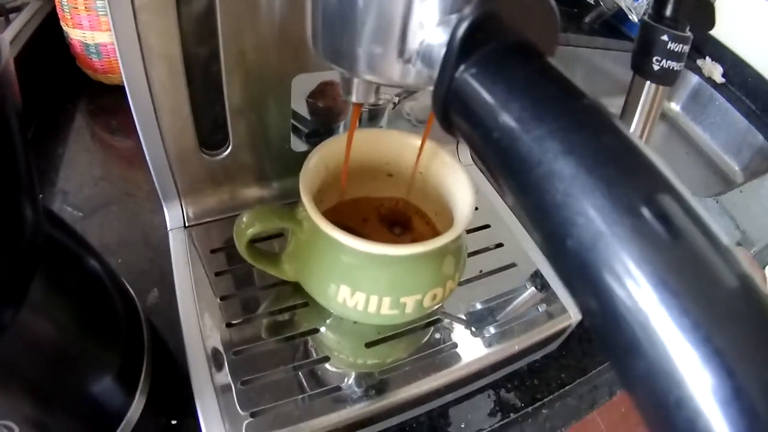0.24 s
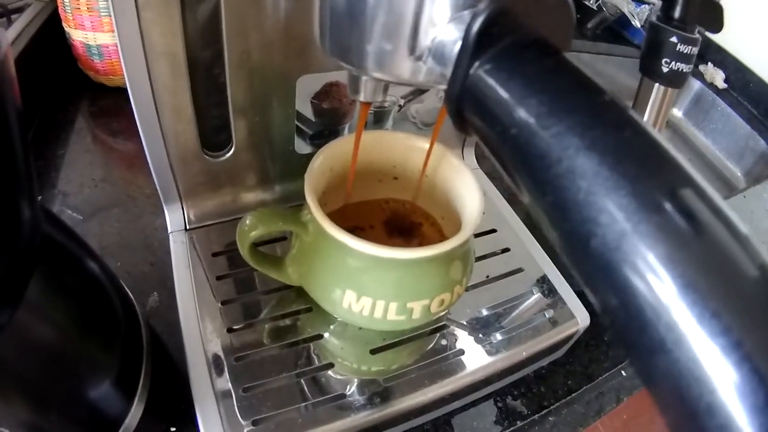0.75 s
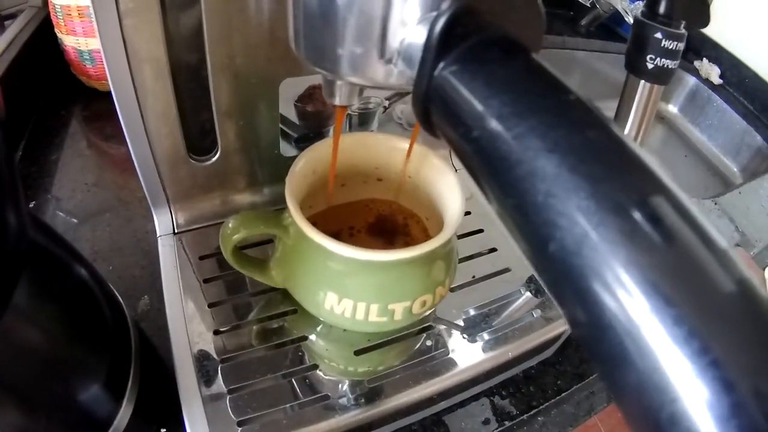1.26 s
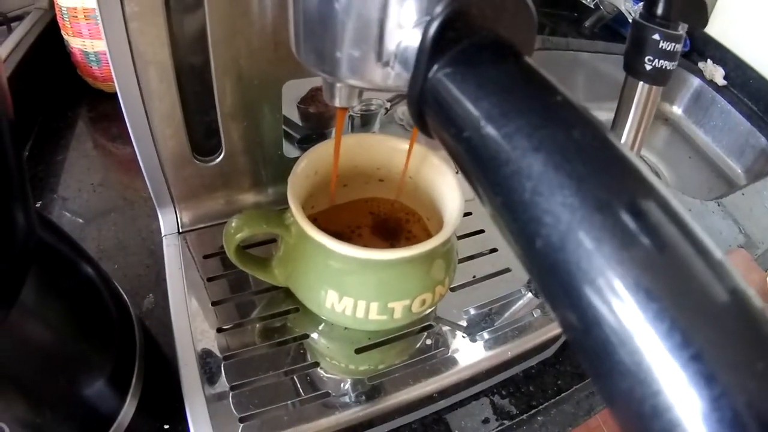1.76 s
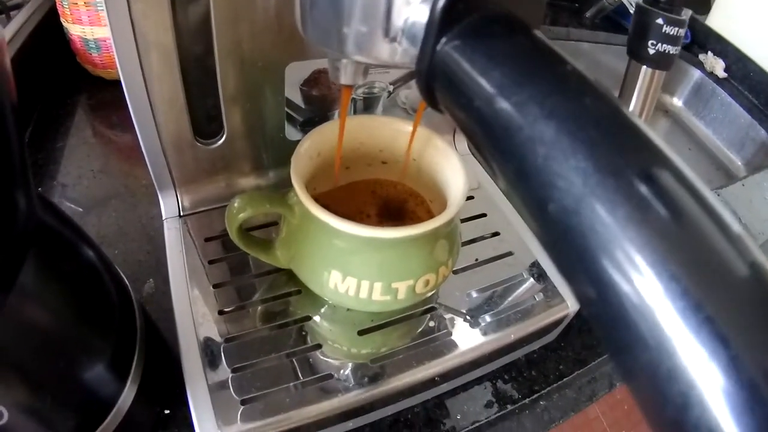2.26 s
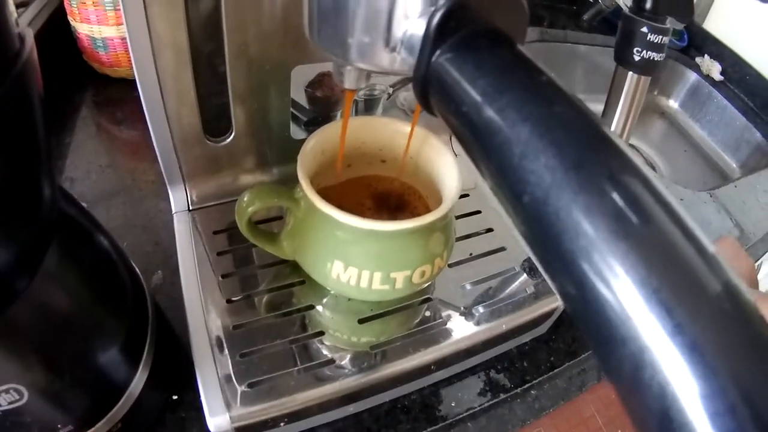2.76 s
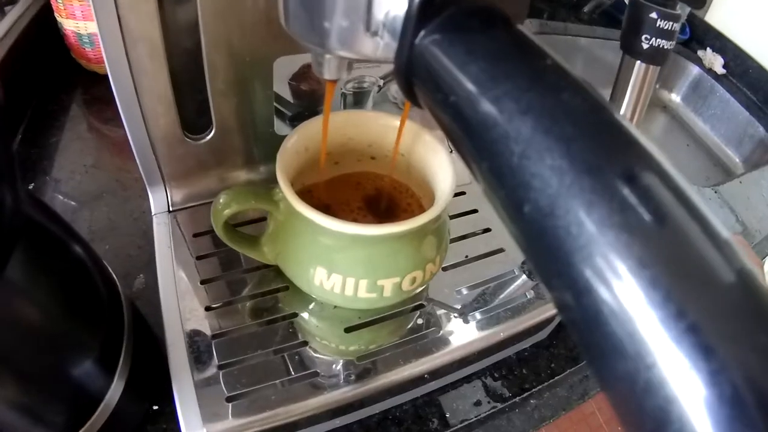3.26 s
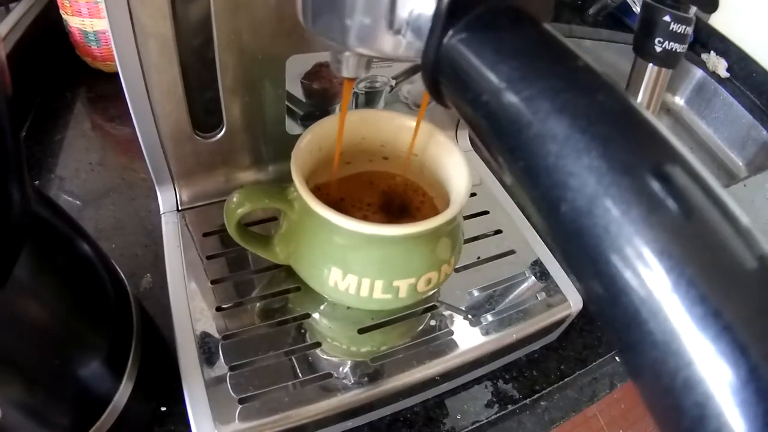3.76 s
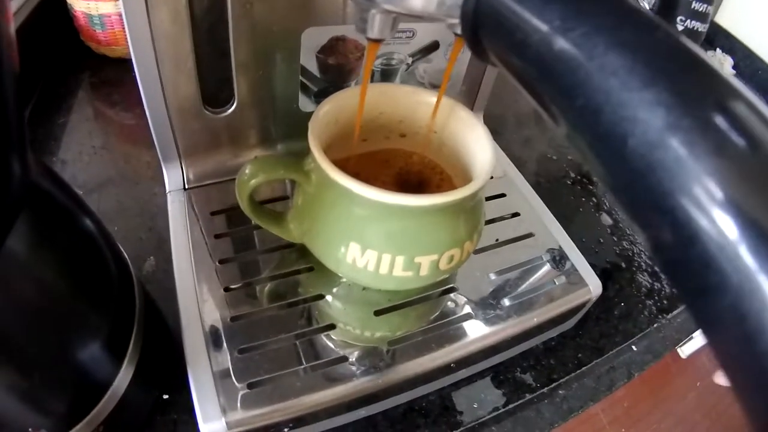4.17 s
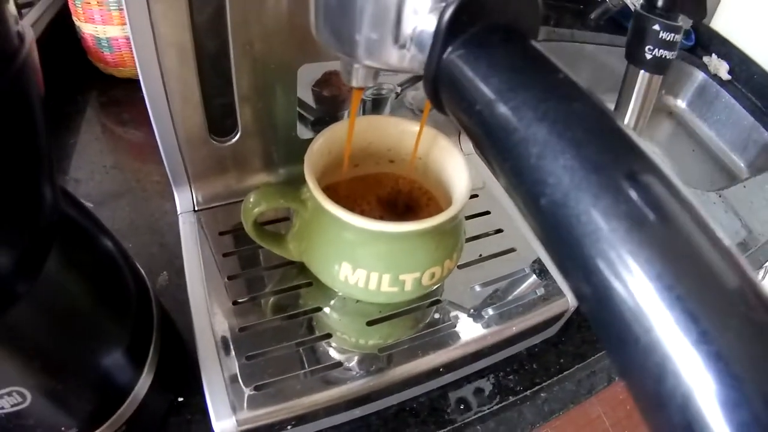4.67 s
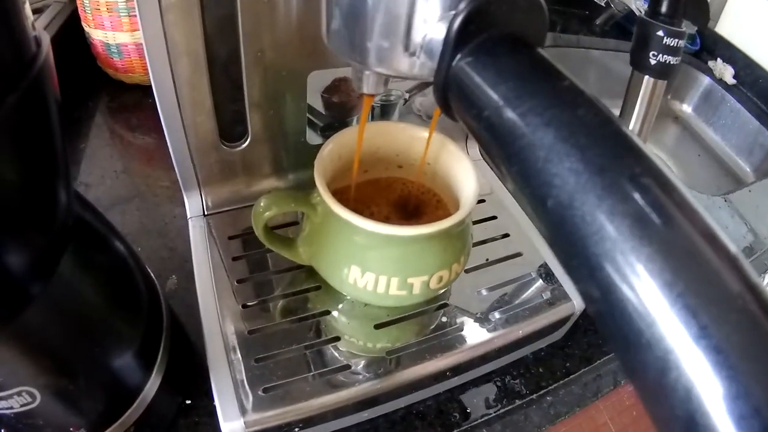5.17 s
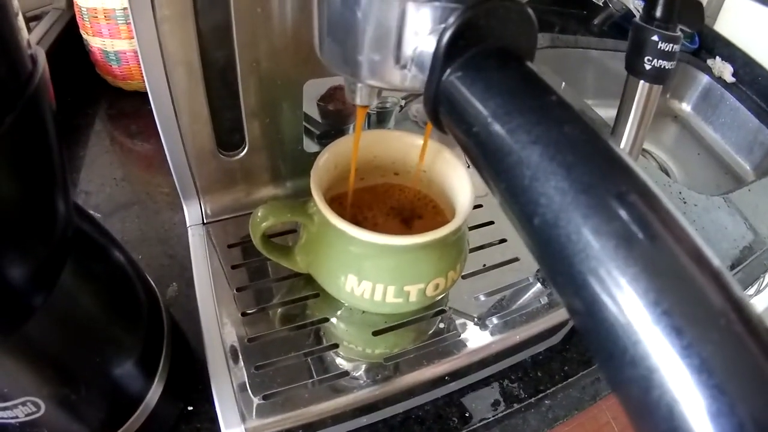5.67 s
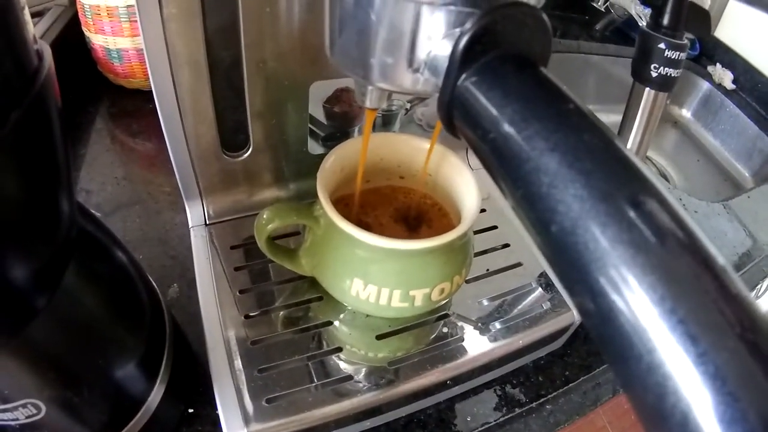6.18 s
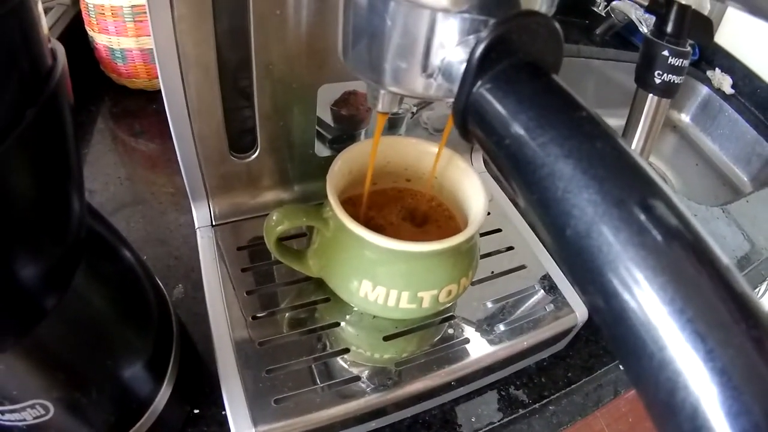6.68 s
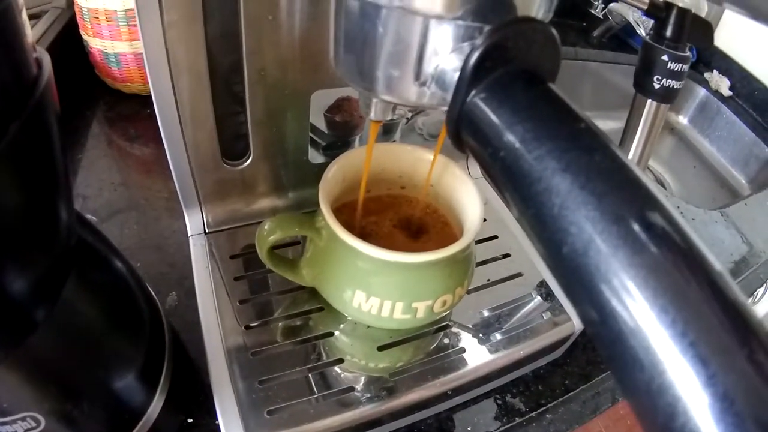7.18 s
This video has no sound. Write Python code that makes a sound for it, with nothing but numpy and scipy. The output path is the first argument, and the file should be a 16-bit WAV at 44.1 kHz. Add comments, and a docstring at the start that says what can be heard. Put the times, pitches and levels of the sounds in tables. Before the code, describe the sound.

Close mains-rate coffee pump drone with irregular cup-on-tray clatter, busy and sharp at first, later sparser and duller, over fine liquid fizz.

```python
"""A vibratory pump, stroking once per mains cycle, makes a coffee machine's housing hum close to a phone.
The hum is a sum of stroke-rate partials: an opening colour fades into a middle one, then shifts to a late one.
The filling cup rattles on the shaking drip tray: short pushes and small clicks ring their shared modes.
Filtered noise makes the valve hiss once a stroke, the splashes, the flickering treble and the room murmur;
random clicks make the trickle fizz in the cup."""
import sys
import numpy as np
from scipy import signal
from scipy.fft import rfft, irfft
from scipy.io import wavfile
from scipy.ndimage import uniform_filter1d

SR = 44100
rng = np.random.default_rng(int(sys.argv[2]) if len(sys.argv) > 2 else 0)


def digitize_waveform(pressure):
    """Quantize a signal to 16-bit integers and store it at the path in sys.argv[1].

    Rows of a 2-D input are taken as channels; values are limited to [-1, 1].
    """
    field = np.atleast_2d(pressure).T
    bounded = np.clip(field, -1, 1)
    quanta = np.round(bounded * 32767).astype(np.int16)
    wavfile.write(sys.argv[1], SR, quanta)


N = 327701

# modes of cup on tray: (frequency [Hz], relative level [dB], t60 [s])
TRAY_MODES = [(630, 15, 0.07), (781, 12, 0.051), (829.3, 15, 0.12), (907, 8, 0.13), (1026, 12.5, 0.028),
              (1117, 3.5, 0.037), (1258, 8.5, 0.089), (1351, 16.5, 0.022), (1440, 16.5, 0.038),
              (1408, -5, 0.036), (1660, -3, 0.075), (2354, 11.5, 0.026), (2900, -26, 0.012),
              (3754, 20, 0.018), (3900, -23, 0.019)]
# dense small rattle: (time [s], sharp level [dB], dull level [dB])
RATTLE_LEVELS = [(0, -55.5, -75), (1.8, -52, -72), (4, -56, -62), (4.4, -59, -59), (5.6, -62, -52),
                 (7.43, -68, -49.5)]
# the trickle as the cup fills: (time [s], level [dB], centre [Hz])
CUP_FILLING = [(0, -72, 3730), (5.2, -68, 3900), (6.9, -67.5, 3990), (7.43, -70, 3970)]


def undb(db):
    """Decibels to gain."""
    return 10 ** (np.asarray(db) / 20)


def unit(x):
    """Scale to rms 1."""
    return x / np.sqrt(np.mean(x ** 2))


def curves(table):
    """Each column joined by straight lines in time."""
    s, *columns = np.transpose(table)
    return [np.interp(np.arange(N) / SR, s, c) for c in columns]


def band(x, hz, width):
    """One resonance, width in Hz."""
    return signal.lfilter(*signal.iirpeak(hz, hz / width, fs=SR), x)


def noise(hz, width):
    """A steep band of noise: two equal resonances in a row."""
    return unit(band(band(rng.standard_normal(N), hz, width), hz, width))


def walk(rate):
    """Random levels held 1 / rate s and slewed twice; spread near 1."""
    hold = int(SR / rate)
    steps = np.repeat(rng.standard_normal(N // hold + 1), hold)
    return 1.4 * uniform_filter1d(uniform_filter1d(steps, hold), hold)[:N]


def sparks(rate, scatter_db):
    """Random clicks of either sign, rate per second, a few much larger than the rest."""
    chance = rng.random((3, N))
    hits = chance[0] < rate / SR
    size = undb(-scatter_db * np.log(chance[1] + 0.0058))
    return hits * size * np.sign(chance[2] - .5)


def stroke_turns():
    """The mains drives the pump: its phase counts strokes."""
    # (time [s], stroke rate [Hz])
    mains = [(0, 60.004), (7.43, 60.02)]
    return np.cumsum(curves(mains)[0]) / SR


def hum(turns, wobble_db=0.1238, wobble_rad=0.013, bend=22., drag=11.45, late=.594, turn_rad=2.45):
    """Partials start from minimum phase; a chosen smooth lag spreads each stroke over the cycle."""
    # overall hum: (time [s], level [dB])
    pump_level = [(0, -41.5), (2, -40.5), (4.1, -40), (4.7, -41.5), (6.3, -41.5), (6.7, -42.5), (7.43, -42)]
    # hum colours in order of appearance: (multiple of the stroke rate, relative level [dB])
    opening_colour = [(1, -14.5), (2, -23), (3, -7.5), (4, -10.5), (5, -15.5), (6, 0.5), (7, -22),
                      (8, -17.5), (9, -5), (10, -15.5), (11, -20.5), (12, -23.5), (13, -13), (14, -13.5),
                      (15, -25), (16, -25), (17, -17), (18, -33), (19, -27.5), (20, -36), (21, -35),
                      (22, -25), (23, -22), (24, -19), (25, -21), (26, -33), (27, -38), (28, -32),
                      (29, -21.5), (30, -22), (31, -28), (32, -26), (33, -36), (34, -45), (35, -46),
                      (36, -40), (37, -50), (38, -41), (39, -44), (40, -32), (41, -46), (42, -41)]
    middle_colour = [(1, -16), (2, -21.5), (3, -8.5), (4, -10.5), (5, -19.5), (6, 1.5), (7, -15.5),
                     (8, -13), (9, -10.5), (10, -17), (11, -29), (12, -22), (13, -17), (14, -14.5),
                     (15, -24.5), (16, -22), (17, -14.5), (18, -22.5), (19, -22), (20, -37.5), (21, -32),
                     (22, -28), (23, -34), (24, -21), (25, -24), (26, -22.5), (27, -37.5), (28, -29),
                     (29, -22.5), (30, -29.5), (31, -31), (32, -36.5), (33, -39), (34, -49), (35, -35),
                     (36, -39.5), (37, -55.5), (38, -43), (39, -47.5), (40, -39.5), (41, -38), (42, -50)]
    late_colour = [(1, -16), (2, -21.5), (3, -8), (4, -9), (5, -19), (6, 1.5), (7, -18), (8, -18.5),
                   (9, -5.5), (10, -24), (11, -21.5), (12, -23), (13, -10), (14, -13), (15, -18),
                   (16, -23.5), (17, -17), (18, -30.5), (19, -23), (20, -41.5), (21, -28), (22, -29),
                   (23, -35), (24, -17.5), (25, -21), (26, -29), (27, -36), (28, -28), (29, -17.5),
                   (30, -24), (31, -25.5), (32, -36.5), (33, -46.5), (34, -56), (35, -35.5), (36, -42),
                   (37, -41), (38, -39), (39, -37), (40, -35.5), (41, -35.5), (42, -52.5)]
    fade_s, shift_s, shift_time_s = 2.06, 4.13, 0.26
    t = np.arange(N) / SR
    level_db = curves(pump_level)[0]
    # the opening colour fades over about two seconds; the hum's colour shifts around 4.1 s
    shifted = (1 + np.tanh((t - shift_s) / shift_time_s)) / 2
    opening_share = np.exp(-(t / fade_s) ** 2)
    opening, middle, last = (np.array(table)[:, 1] for table in (opening_colour, middle_colour, late_colour))
    # minimum phase from the log spectrum, padded below and above the partials
    log_gain = np.log(undb(np.r_[-40, (middle + last) / 2, np.full(20, -60)]))
    phase = -signal.hilbert(np.r_[log_gain, log_gain[-2:0:-1]]).imag
    out = 0
    for k in range(1, len(middle) + 1):
        lag = bend * np.sqrt(k) + drag * np.log(k) + 2 * np.pi * k * late + turn_rad
        db = middle[k - 1] + shifted * (last - middle)[k - 1] + opening_share * (opening - middle)[k - 1]
        # high partials feel small changes of the stroke most
        db = db + wobble_db * np.sqrt(k) * walk(14)
        angle = 2 * np.pi * k * turns + phase[k] - lag + wobble_rad * k * walk(16)
        out = out + undb(db) * np.cos(angle)
    return np.sqrt(2) * undb(level_db) * out


def blows(table, cycles, colour_db, crack_db, direct_db):
    """Each contact is a short push that rings the modes near its centre; every spot weighs them anew."""
    out, t = np.zeros(N + 4096), np.arange(4096) / SR
    hz, db, t60 = np.transpose(TRAY_MODES)[:, :, None]
    modes = rfft(undb(db) * np.sin(2 * np.pi * hz * t) * np.exp(-np.log(1000) * t / t60), 8192)
    # the hard first touch reaches the high modes
    edge = np.diff(np.exp(-((t - .0004) / .00006) ** 2), prepend=0)
    for (s, db, hz), spot in zip(table, rng.standard_normal((len(table), len(TRAY_MODES)))):
        swell = np.sin(np.pi * np.clip(t * hz / cycles, 0, 1) ** 0.6) ** 2
        push = swell * np.sin(2 * np.pi * hz * t) + undb(crack_db) * edge
        response = undb(colour_db * spot) @ modes + undb(direct_db)
        sound = irfft(rfft(push, 8192) * response)[:4096]
        i = int(s * SR)
        out[i:i + 4096] += sound * undb(db) / np.abs(sound).max()
    return out[:N]


def bounces(table):
    """Each knock falls back once, a little early or late, softer and lower."""
    bounce_s, bounce_db = .0135, -12.5  # mean delay and mean level change
    s, db, hz = np.transpose(table)
    late, soft, low = rng.standard_normal((len(table), 3)).T
    fall_s = s + bounce_s * (1 + 0.18 * late)
    return np.transpose([fall_s, db + bounce_db + 3. * soft, hz * (0.95 + 0.024 * low)])


def scattered(db, hz, spread, count):
    """Light contacts at random moments, of random strength and pitch; db is their ceiling over time."""
    when, size, pitch = rng.random((count, 3)).T
    peak_db = db[(when * N).astype(int)] - 16.3 * size
    return np.transpose([when * N / SR, peak_db, hz * (1 + spread * (2 * pitch - 1))])


def cup_rattle():
    """The cup strikes the tray: sharp knocks with bounces, dull thuds, light ticks and a long ping."""
    # all four: (time [s], peak level [dB], centre [Hz])
    knocks = [(0.0125, -34, 1320), (0.1402, -22, 1470), (0.1536, -24.5, 1470), (0.1678, -30, 1440),
              (0.2022, -34, 1370), (0.2424, -36, 1400), (0.2541, -35, 1420), (0.3908, -35.5, 1400),
              (0.4512, -33, 1440), (0.4635, -32.5, 1430), (0.5169, -25.5, 1490), (0.5732, -38, 1390),
              (0.601, -33.5, 1330), (0.6691, -33, 1480), (0.7451, -21.5, 1380), (0.7647, -20, 1430),
              (0.8799, -28.5, 1520), (0.9867, -25.5, 1490), (1.0039, -38, 1430), (1.03, -25, 1470),
              (1.1105, -24, 1450), (1.2008, -27.5, 1300), (1.2576, -21, 1430), (1.3896, -32.5, 1320),
              (1.4518, -29, 1410), (1.4879, -30, 1420), (1.5197, -30.5, 1270), (1.6047, -34, 1450),
              (1.6485, -30.5, 1320), (1.6656, -31, 1350), (1.6781, -23, 1290), (1.7446, -31, 1400),
              (1.7808, -28.5, 1340), (1.8544, -27.5, 1500), (1.9173, -33, 1410), (2.029, -35, 1400),
              (2.052, -35, 1320), (2.0801, -28.5, 1390), (2.0971, -28, 1330), (2.1535, -31, 1360),
              (2.2129, -32, 1430), (2.2354, -29, 1400), (2.297, -37, 1360), (2.3069, -38, 1340),
              (2.3515, -34, 1420), (2.3689, -27.5, 1370), (2.4414, -29, 1270), (2.484, -35, 1430),
              (2.5364, -41, 1310), (2.6123, -37, 1430), (2.7105, -33.5, 1300), (2.8533, -36, 1320),
              (2.9799, -34, 1410), (3.0478, -33, 1380), (3.0651, -35, 1230), (3.1847, -28.5, 1380),
              (3.3535, -32.5, 1320), (3.37, -26.5, 1210), (3.5636, -30, 1360), (3.5875, -34, 1230),
              (3.7709, -30.5, 1440), (3.8566, -28, 1480), (3.9119, -35, 1270), (3.9364, -33.5, 1270),
              (3.978, -36.5, 1300), (4.0543, -37.5, 1250), (4.3198, -31.5, 1320), (4.6732, -36.5, 1340),
              (4.8601, -31.5, 1360), (4.8848, -32, 1300), (4.93, -38, 1340), (5.0516, -36, 1350),
              (5.6706, -35, 1340), (5.9737, -31, 1440), (6.0303, -35, 1430), (6.044, -40, 1315),
              (6.2282, -35.5, 1320), (6.3642, -39, 1440), (6.5168, -36, 1410), (6.5343, -41, 1310),
              (7.087, -40, 1510), (7.2154, -38, 1560)]
    thuds = [(3.0478, -33.5, 806), (3.8515, -36.5, 805), (4.3112, -34.5, 810), (4.3327, -31.5, 815),
             (5.0525, -29, 840), (5.2895, -35, 895), (5.528, -36, 815), (5.9586, -34, 800),
             (5.9979, -31, 845), (6.2474, -31.5, 800), (6.4331, -34, 800), (6.5172, -39, 804),
             (6.5351, -32, 810), (6.9303, -37, 830), (7.087, -37, 730), (7.2277, -32.5, 810),
             (7.2928, -33, 830)]  # of the heavier cup
    ticks = [(0.7791, -50, 3720), (0.827, -49, 3770), (2.3506, -48, 2530), (2.4833, -46.5, 3120),
             (2.8659, -47, 3670), (2.9986, -47, 2750), (3.2415, -46, 3830), (3.556, -43, 2350),
             (4.0547, -51, 3780), (3.8561, -45.5, 3860), (4.3105, -47.5, 3770), (5.1657, -48, 3760),
             (6.5954, -47, 4000), (7.4115, -50, 3100), (4.885, -40, 2370), (4.915, -42, 2400),
             (5.019, -44, 2410), (5.2589, -42.5, 2300), (5.672, -44, 2340), (6.031, -45, 2390),
             (6.1984, -46, 2410), (6.5505, -46, 2400), (6.9496, -43, 2450)]
    ping = [(2.664, -39.5, 1770)]  # one long clear contact
    # ceilings of the random knocks over the sharp rattle and of the random ticks over the trickle
    light_db = curves(RATTLE_LEVELS)[0] + 17.5
    faint_db = curves(CUP_FILLING)[0] + 23
    light = scattered(light_db, 1344, 0.081, count=110)
    faint = scattered(faint_db, 3030, 0.24, count=60)
    out = blows(np.r_[knocks, bounces(knocks), light], cycles=6.0, colour_db=3.0, crack_db=-3.0, direct_db=38.)
    out += blows(thuds, cycles=2.8, colour_db=3.3, crack_db=1.0, direct_db=26.0)
    out += blows(np.r_[ticks, faint], cycles=3.0, colour_db=2.5, crack_db=-4.0, direct_db=44.)
    out += blows(ping, cycles=22.0, colour_db=0, crack_db=-17, direct_db=30.)
    return out


def ring(x):
    """The modes of cup and tray, struck by x."""
    out = 0
    for hz, db, t60 in TRAY_MODES:
        pole = np.exp(2j * np.pi * hz / SR - np.log(1000) / (t60 * SR))
        out = out + undb(db) * signal.lfilter([1], [1, -pole], x).imag
    return out


def chatter(turns):
    """Many small contacts of scattered size ring the tray; the dull ones come with the stroke."""
    out = 0
    # sharp, dull: (centre [Hz], width [Hz], base rate [1/s], scatter [dB], stroke lock)
    kinds = [(1350, 650, 150, 2.7, 0.), (850, 470, 420, 2.0, .8)]
    for db, (hz, width, rate, scatter_db, lock) in zip(curves(RATTLE_LEVELS), kinds):
        stroke = np.exp(lock * np.cos(2 * np.pi * turns))
        hits = sparks(rate * stroke * undb(2.5 * walk(8.2)), scatter_db)
        out = out + undb(db) * unit(ring(band(band(hits, hz, width), hz, width)))
    return out


def valves(turns):
    """Water squeezes past the valves once a stroke, each stroke a little differently."""
    # hiss resonances: (centre [Hz], width [Hz], level before the gain [dB])
    resonances = [(2460, 480, -76.5), (6140, 410, -83.5), (7275, 970, -78.5), (9100, 3300, -79.5)]
    # (time [s], gain [dB])
    hiss_gain = [(0, 0.5), (1.5, 1.5), (3, 0.5), (4.5, 0), (6, -0.5), (7.43, -3)]
    gate = np.exp(.85 * np.cos(2 * np.pi * turns)) * undb(1.5 * walk(50))
    hiss = 0
    for hz, width, db in resonances:
        hiss = hiss + undb(db + 1.2 * walk(12)) * unit(gate * noise(hz, width))
    return undb(curves(hiss_gain)[0]) * hiss


def trickle(width=360.0):
    """Fine droplets fizz in the cup; its air space lifts a broad band that rises as the cup fills."""
    db, hz = curves(CUP_FILLING)
    clicks = [sparks(2500., 2.5), sparks(2500., 2.5)]
    fizz = signal.sosfilt(signal.butter(2, width, fs=SR, output="sos"), clicks)
    # the low fizz is shifted up to the moving centre
    carrier = np.exp(2j * np.pi * np.cumsum(hz) / SR)
    cup = unit(((fizz[0] + 1j * fizz[1]) * carrier).real)
    spray = undb(-4.5) * unit(band(band(clicks[0], 2900, 1700), 2900, 1700))
    spray = spray + undb(-8) * unit(band(clicks[1], 3380, 150))
    return undb(db + 1.1 * walk(14)) * (cup + spray)


def splashes(t60=.045):
    """Droplets spit: broad short bursts of noise, t60 in s."""
    # (time [s], starting level [dB], centre [Hz])
    drops = [(0.0638, -61, 7030), (1.6766, -63, 7200), (6.482, -56.5, 9500)]
    out, t = np.zeros(N + 2048), np.arange(2048) / SR
    for (s, db, hz), puff in zip(drops, rng.standard_normal((len(drops), 2048))):
        i = int(s * SR)
        decay = np.exp(-np.log(1000) * t / t60)
        out[i:i + 2048] += undb(db) * unit(band(puff, hz, 0.53 * hz)) * decay
    return out[:N]


def spits():
    """The top treble hisses briefly: noise under short rounded gates."""
    # (time [s], length [s], level [dB])
    hisses = [(4.44, .03, -78), (7.359, .045, -73)]
    t = np.arange(N) / SR
    gate = 0
    for s, length, db in hisses:
        gate = gate + undb(db) * np.sin(np.pi * np.clip((t - s) / length, 0, 1)) ** .5
    return gate * noise(13100, 900)


def flicker():
    """The top treble puffs in short bursts, about fifteen a second, with random extra ones between."""
    beat = np.diff(np.floor(np.cumsum(15.3 * (1 + .12 * walk(12))) / SR), prepend=0)
    starts = beat * undb(2 * walk(15)) + .7 * np.abs(sparks(10., 1.))
    puffs = signal.fftconvolve(starts, np.hanning(750))[:N]
    return undb(-83) * unit(puffs) * noise(12500, 2000)


def murmur():
    """Third-octave bands of flow and room noise, each flickering a little."""
    # (frequency [Hz], relative density [dB per Hz])
    spectrum = [(25, -8), (40, -5), (60, -2), (100, -2), (170, -6), (270, 0.5), (350, -3), (450, -6.5),
                (700, -4.5), (1100, -7.5), (1700, -3), (2100, -46), (3000, -17), (5000, -30), (8000, -27),
                (11000, -37), (15000, -32.5)]
    f, density_db = np.transpose(spectrum)
    out = 0
    for hz in 28 * 2 ** np.arange(0, 9.3, 1 / 3):
        # a wider band holds more power
        db = np.interp(np.log(hz), np.log(f), density_db) + 10 * np.log10(hz) + 1.2 * walk(11)
        out = out + undb(db) * noise(hz, hz / 3)
    return undb(-54.5) * unit(out)


def scene():
    """Hum, rattle, water and room at one microphone."""
    turns = stroke_turns()
    machine = hum(turns) + valves(turns)
    cup = cup_rattle() + chatter(turns)
    water = trickle() + splashes()
    air = spits() + flicker() + murmur()
    return (machine + cup + water + air)[None]


def record(dry):
    """The phone cuts the top with a steep low-pass at 15350 Hz."""
    return signal.sosfilt(signal.ellip(16, .2, 80, 15350, fs=SR, output="sos"), dry)


dry = scene()
out = record(dry)
digitize_waveform(out)
```